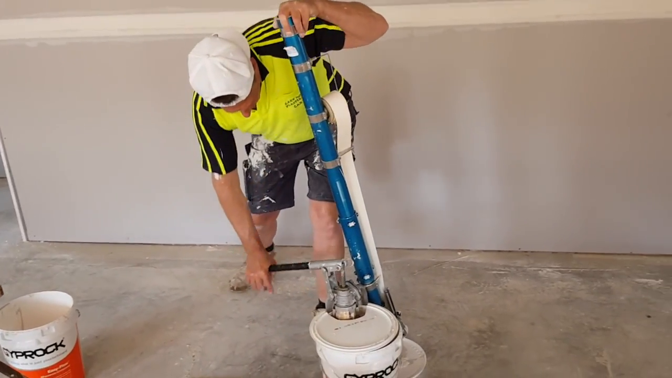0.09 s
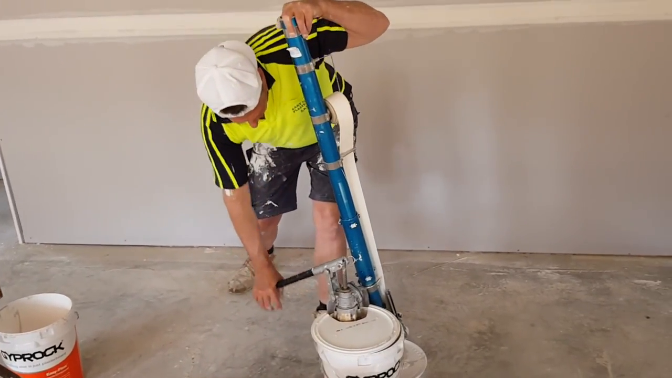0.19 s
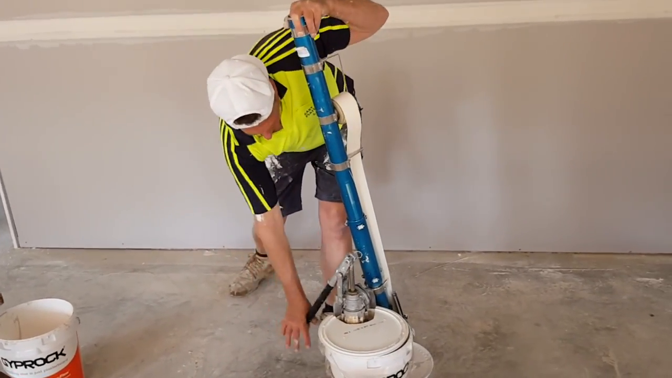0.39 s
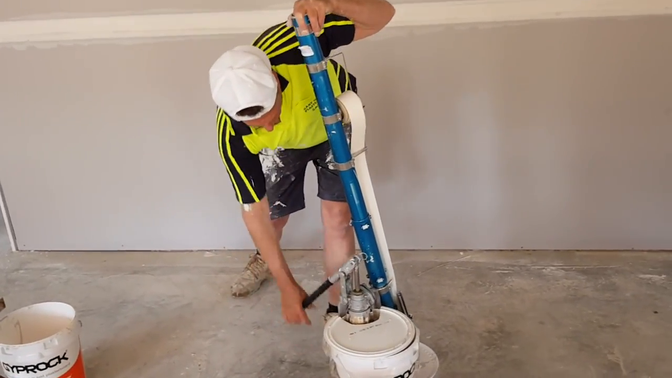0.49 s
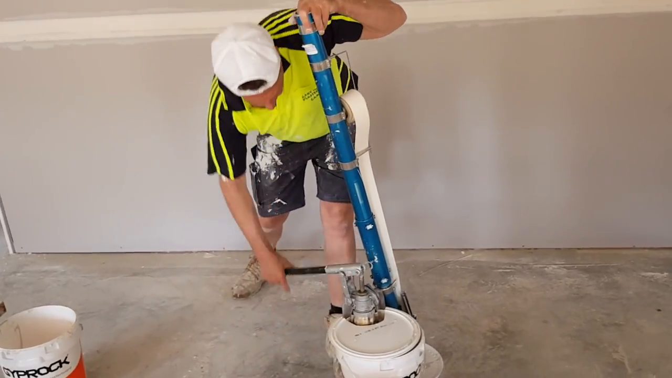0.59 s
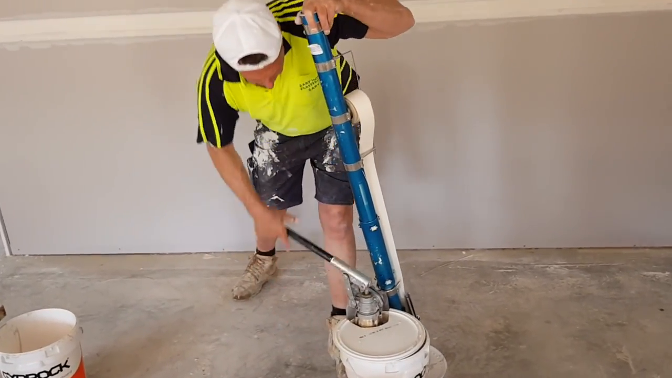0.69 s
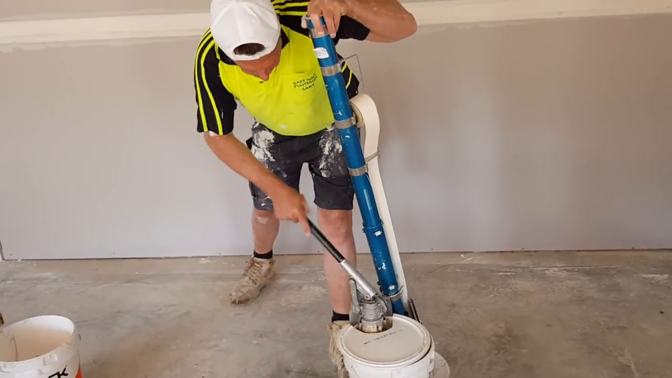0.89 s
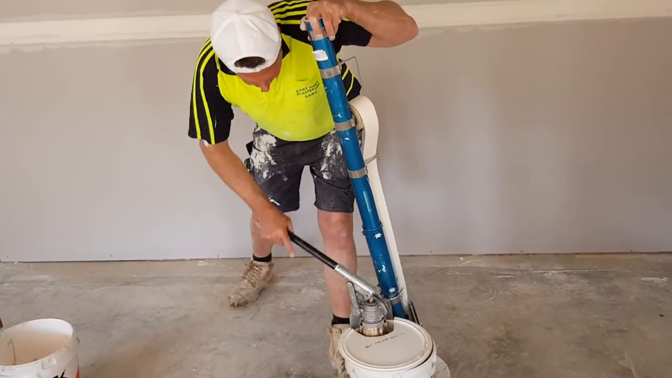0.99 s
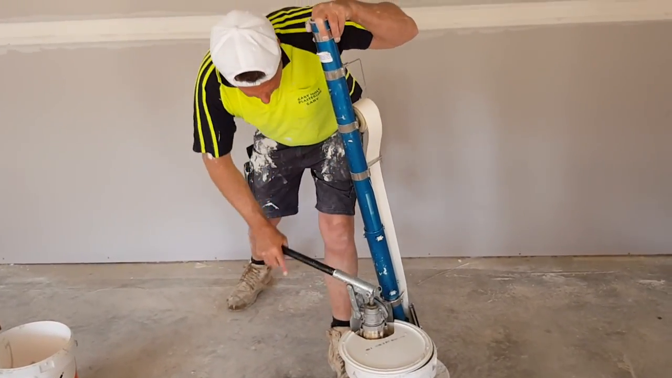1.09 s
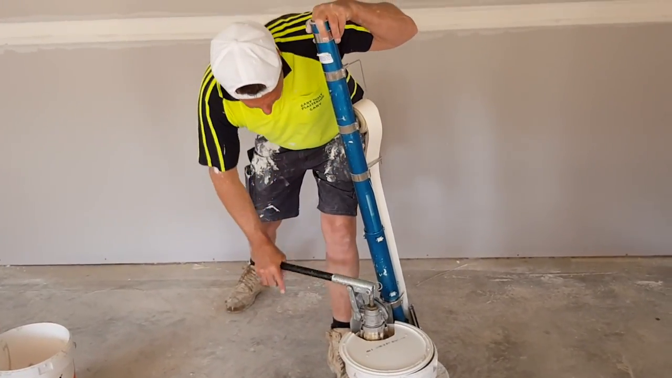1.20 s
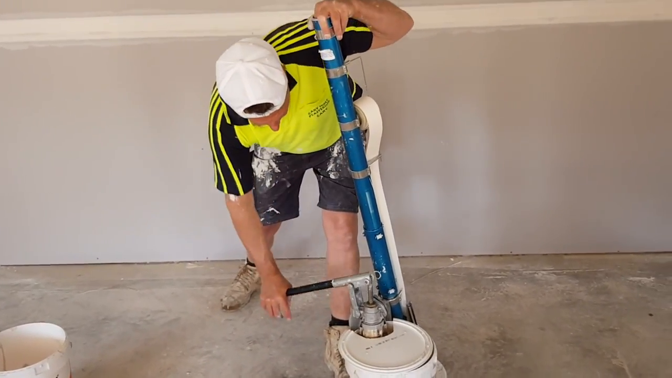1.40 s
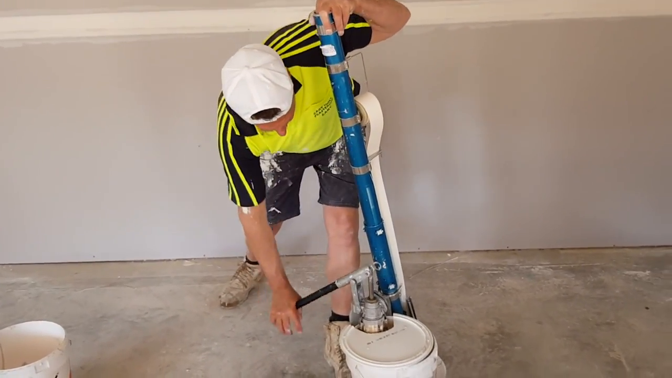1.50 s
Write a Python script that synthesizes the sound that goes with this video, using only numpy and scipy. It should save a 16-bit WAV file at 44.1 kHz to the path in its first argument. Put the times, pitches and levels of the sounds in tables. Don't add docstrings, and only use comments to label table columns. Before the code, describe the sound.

Hand-pump lever strokes with high dry squeals, hard metal clacks and dull bucket thuds, indoors

```python
import sys
import numpy as np
from scipy import signal
from scipy.fft import rfft, irfft
from scipy.io import wavfile
from scipy.ndimage import uniform_filter1d

SR = 44100
rng = np.random.default_rng(int(sys.argv[2]) if len(sys.argv) > 2 else 0)


def how_loud(loudness_db):
    steps = np.asarray(loudness_db, float) / 20
    return 10 ** steps


def to_wav(s):
    ch = np.atleast_2d(s).T
    pcm = np.round(np.clip(ch, -1, 1) * 32767)
    wavfile.write(sys.argv[1], SR, pcm.astype(np.int16))


N = 66150


def evened(x):
    return x / np.sqrt(np.mean(x ** 2) + 1e-20)


def read(points, hz):
    f, value = np.transpose(points)
    return np.interp(np.log(hz + 1), np.log(f + 1), value)


def colour(x, points):
    return irfft(rfft(x) * how_loud(read(points, np.fft.rfftfreq(len(x), 1 / SR))), len(x))


def resonate(x, hz, width):
    carrier = np.exp(2j * np.pi * hz * np.arange(len(x)) / SR)
    pole = np.exp(-np.pi * width / SR)
    return 2 * (carrier * signal.lfilter([1 - pole], [1, -pole], x / carrier)).real


def ring(hz, t60, rise_s):
    t = np.arange(SR // 2) / SR
    return (1 - np.exp(-t / rise_s)) * how_loud(-60 * t / t60) * np.sin(2 * np.pi * hz * t)


def add(track, s, sound):
    part = track[round(s * SR):][:len(sound)]
    part += sound[:len(part)]


def played(times, table, source):
    track = np.zeros(N)
    for s, row in zip(times, table):
        add(track, s, source(*row))
    return track


def room(x, wet_db, pan_db, send=None):
    # f/Hz, t60/s
    room_decay = [(100, 0.2), (700, 1.), (2000, 1), (5600, .85), (11000, 0.42), (15000, 0.28)]
    first_echo_s, left_late_s = 0.0033, 1.5e-5
    count = SR + SR // 2
    taps = rng.standard_normal((2, count)) * (np.arange(count) > first_echo_s * SR)
    hz, t, z = signal.stft(taps, SR, nperseg=256)
    t60 = read(room_decay, hz)[:, None]
    decay = how_loud(-60 * t / t60) / np.sqrt(t60 * SR / (2 * np.log(1000)))
    tail = signal.istft(z * decay, SR, nperseg=256)[1]
    late = irfft(rfft(x) * np.exp(-2j * np.pi * np.fft.rfftfreq(N, 1 / SR) * left_late_s), N)
    direct = np.array([late * how_loud(pan_db / 2), x / how_loud(pan_db / 2)])
    wet = signal.fftconvolve((x if send is None else send)[None], tail, axes=1)[:, :N]
    return direct + how_loud(wet_db) * wet


def hiss(points, patchy_db):
    # f/Hz, likeness (0 to 1)
    likeness = [(30, 1), (200, 0.52), (600, 0.067), (15000, 0.033)]
    hz = np.fft.rfftfreq(1024, 1 / SR)
    a, b, c, d, patches = rng.standard_normal((N // 256 + 5, 513, 5)).T
    patches = evened(uniform_filter1d(uniform_filter1d(patches, size=12, axis=0), size=10, axis=1))
    same = np.clip(read(likeness, hz), -1, 1)[:, None]
    left, other = a + 1j * b, c + 1j * d
    z = np.array([left, same * left + np.sqrt(1 - same ** 2) * other])
    z = z * how_loud(read(points, hz)[:, None] + patchy_db * patches)
    return evened(signal.istft(z, nperseg=1024, noverlap=768)[1][:, :N])


def air():
    # f/Hz, level/dB per Hz
    air_spectrum = [(25, -47), (64, -1.5), (152, -6), (330, -18), (800, -10.5), (2010, -8), (6200, -17.5),
                    (7300, -22.5), (15500, -34)]
    return how_loud(-53) * hiss(air_spectrum, 2.2)


def earlier_stroke():
    # f/Hz, level/dB per Hz
    tail_spectrum = [(35, -46), (70, 3.5), (451, -7.5), (2000, -12), (6200, -19), (7300, -27), (15000, -40)]
    t60 = 1
    return how_loud(-49.5 - 60 * np.arange(N) / SR / t60) * hiss(tail_spectrum, 2.6)


def shoe_scuff():
    # f/Hz, level/dB
    grit_spectrum = [(600, -12), (1500, -4), (4500, -9.5), (9000, -13), (15000, -30)]
    peak_s, rise_s = 1.45, 0.065
    swell = np.exp(-((np.arange(N) / SR - peak_s) / rise_s) ** 2)
    return how_loud(-56) * swell * hiss(grit_spectrum, 0.86)


def piston_drag():
    # f/Hz, level/dB per Hz
    drag_spectrum = [(50, -28), (110, -11), (220, -3), (400, -14.5), (800, -3), (2000, -18), (5000, -8.5),
                     (8000, -42)]
    start_s, rise_s, end_s, fade_s = 0.374, 0.0067, 0.6, 0.023
    t = np.arange(N) / SR
    drag = np.clip((t - start_s) / rise_s, 0, 1) / (1 + np.exp((t - end_s) / fade_s))
    return how_loud(-50.5) * drag * hiss(drag_spectrum, 1.6)


def thud(db, hz, t60, tick_db):
    u = np.arange(SR // 2) / SR / 0.00029
    tick = u * (2 - u) * np.exp(1 - u)
    return how_loud(db) * (ring(hz, t60, 0.0025) - how_loud(tick_db) * tick)


def bucket_thuds():
    thud_starts = [.0605, .075, .112, .1483, .268, .41, .445, .51, .532, .575, .60, .87, .955, .98, 1.24]
    # level/dB, f/Hz, t60/s, tick level/dB
    thud_rows = [(-36.5, 144, 0.05, -0.5), (-39.5, 123, 0.13, -38), (-40.5, 143, 0.083, -44.5),
                 (-35, 124, 0.043, -2.5), (-46, 151, 0.34, -35), (-38, 175, 0.076, -48),
                 (-39, 237, 0.068, -45), (-53, 85, 0.3, -26), (-36, 233, 0.048, -11),
                 (-47.5, 83.4, 0.23, 2), (-38, 120, 0.062, -6), (-53, 160, 0.69, -23),
                 (-43.5, 200, 0.093, -48), (-38.5, 88, 0.059, 0.5), (-64.5, 360, 0.26, -40)]
    return room(played(thud_starts, thud_rows, thud), -3, -1.9)


def knock(db, hz):
    return how_loud(db) * ring(hz, 0.009, 0.00047)


def linkage_knocks():
    knock_starts = [.020, .349, .362, .405, .463, .486, .507, .539, .675, .806, .825, .842, .985, .99, 1.02]
    # level/dB, f/Hz
    knock_rows = [(-36.5, 453), (-36, 540), (-39, 330), (-27, 694), (-31.5, 660), (-30, 756), (-30.5, 704),
                  (-35.5, 440), (-37, 570), (-32, 504), (-45, 510), (-41, 670), (-36.5, 1350), (-41.5, 256),
                  (-35.5, 510)]
    return room(played(knock_starts, knock_rows, knock), 5.5, 9)


def creak(length, db, slips_hz):
    # f/Hz, width/Hz, level/dB
    barrel_modes = [(745, 215, 5), (1457, 180, 3.5), (2003, 223, 7), (2710, 200, -3.5)]
    t = np.arange(8192) / SR
    jitter = 0.08 * evened(uniform_filter1d(rng.standard_normal(8192), size=120))
    turns = np.cumsum(slips_hz * (1 + jitter)) / SR
    slips = np.diff(np.floor(turns), prepend=0)
    slips = slips * how_loud(2.45 * rng.standard_normal(8192))
    slips = slips * (t < length) * how_loud(-6 * t / length)
    body = sum(how_loud(g) * resonate(resonate(slips, f, w), f, 2 * w) for f, w, g in barrel_modes)
    return how_loud(db) * SR / slips_hz / 2 * body


def piston_creaks():
    creak_starts = [.703, .748, .815]
    # length/s, level/dB, slips per second/Hz
    creak_rows = [
        (.042, -40.5, 735),
        (0.037, -46.5, 735),
        (0.018, -45, 740),
    ]
    return room(played(creak_starts, creak_rows, creak), 1.5, 0.5)


def clack(db, ring_db, bright_db):
    # f/Hz, level/dB
    crack_spectrum = [(200, -21.5), (600, -9), (1500, 6), (3000, 4), (5000, 4.5), (7500, -14.5),
                      (10500, -6.5), (15000, -51)]
    # f/Hz, level/dB, t60/s
    lever_modes = [(676, -7.5, 0.023), (1500, -26, 0.041), (1740, -26, 0.029), (1913, -5.5, 0.019),
                   (2076, 4, 0.025), (2255, -1.5, 0.0063), (2402, -2, 0.021), (2640, -17, 0.033),
                   (3560, -12, 0.024), (4006, -7.5, 0.018), (10100, -20, .006)]
    t = np.arange(4096) / SR
    chatter = how_loud(-4.5) * rng.standard_normal(4096) * np.exp(-t / 0.0044)
    tilted = [(f, g + bright_db * max(f - 4000, 0) / 5000) for f, g in crack_spectrum]
    crack = colour(2 * (t == 0) + chatter, tilted)
    body = np.zeros(4096)
    for f, g, t60 in lever_modes:
        detuned = f * (1 + 0.016 * rng.standard_normal())
        body += ring(detuned, t60, 0.00014)[:4096] * how_loud(g)
    return how_loud(db) * (crack * (t < 0.05) + how_loud(ring_db - 2.5) * body)


def lever_clacks():
    clack_starts = [.4035, .416, .441, .8558, .8625, .882, .988]
    # level/dB, ring level/dB, brightness/dB
    clack_rows = [
        (-23, -14.5, -1),
        (-31, 2, -8),
        (-38, -9, -14),
        (-27, -9, 0),
        (-40.5, 10, -12),
        (-29.5, -1.5, -20.5),
        (-34, -3, -22),
    ]
    return room(played(clack_starts, clack_rows, clack), 4.5, -2.8)


def squeal(db, length, rise_s, from_hz, to_hz):
    t = np.arange(0, length, 1 / SR)
    drift = uniform_filter1d(uniform_filter1d(rng.standard_normal(4096), size=300), size=300)
    waver = 0.0006 * (from_hz / 5700) ** 2 * evened(drift)[:len(t)]
    glide = from_hz + (to_hz - from_hz) * t / length
    phase = 2 * np.pi * np.cumsum(glide * (1 + waver)) / SR
    fall_s, sag_db, octave_db = 0.0073, -4.5, -19.5
    shape = np.minimum(t / rise_s, 1) ** 2 * np.minimum((length - t) / fall_s, 1)
    shape = shape * how_loud(sag_db * t / length)
    octave = how_loud(octave_db) * (4 * from_hz < SR) * np.sin(2 * phase)
    return how_loud(db) * shape * (np.sin(phase) + octave)


def pivot_squeals():
    # level/dB, room level/dB
    squeal_levels = [(-22, 5), (-23, -5.5), (-31.5, -1), (-30, 11), (-33, 6), (-26, 0.5), (-37.5, 4.5),
                     (-46, 8)]
    # t/s, length/s, rise/s, start f/Hz, end f/Hz
    squeal_glides = [
        (.203, .068, .022, 5725, 5600),
        (.554, .052, .012, 11390, 11420),
        (.600, .054, .016, 14680, 14750),
        (.626, .014, .006, 13980, 13750),
        (.636, .014, .003, 13750, 11950),
        (.646, .016, .004, 11850, 11740),
        (.659, .013, .004, 11600, 10750),
        (.545, .048, .02, 2490, 2470),
    ]
    near, far = np.zeros((2, N))
    for (db, wet_db), (s, *course) in zip(squeal_levels, squeal_glides):
        tone = squeal(db, *course)
        add(near, s, tone)
        add(far, s, how_loud(wet_db) * tone)
    return room(near, 0, 1.4, far)


def scene():
    mix = air() + earlier_stroke()
    mix += shoe_scuff()
    mix += piston_drag()
    mix += pivot_squeals() + lever_clacks()
    mix += piston_creaks()
    mix += bucket_thuds()
    return mix + linkage_knocks()


def masked_treble_loss(x):
    under_tone_db, under_treble_db, over_floor_db, lowest_hz = 57, 14, 0.5, 3400
    hz, t, z = signal.stft(x, SR, nperseg=1536, noverlap=1024)
    power = uniform_filter1d((abs(z) ** 2).mean(axis=0), size=11, axis=0)
    band_db = 10 * np.log10(power + 1e-14)
    tone = band_db[hz > 5000].max(axis=0)
    treble = np.median(band_db[(hz > 11000) & (hz < 15000)], axis=0)
    uneven = 2.5 * rng.standard_normal(len(hz) // 16 + 1).repeat(16)[:len(hz), None]
    floor = np.median(band_db, axis=1, keepdims=True) + uneven
    fall = 25 * t
    tone = np.maximum.accumulate(tone + fall) - fall
    limit = np.maximum(tone - under_tone_db, np.minimum(treble - under_treble_db, floor + over_floor_db))
    lost = (hz > lowest_hz)[:, None] / (1 + np.exp(-2 * (limit - band_db)))
    return signal.istft(z * (1 - lost), SR, nperseg=1536, noverlap=1024)[1][:, :N]


def low_pass(x):
    return signal.sosfilt(signal.butter(12, 15720, fs=SR, output="sos"), x)


def record(dry):
    lowpass = signal.firwin(511, 15800, window=("kaiser", 9), fs=SR)
    cut = signal.oaconvolve(dry, lowpass[None], "same")
    return low_pass(masked_treble_loss(cut))


dry = scene()
out = record(dry)
to_wav(out)
```